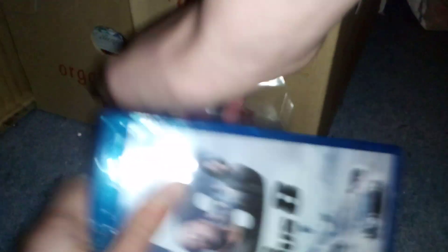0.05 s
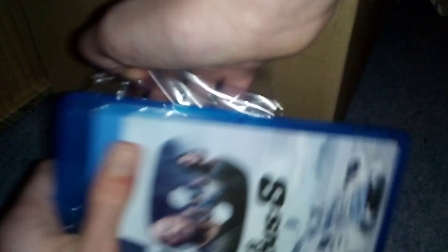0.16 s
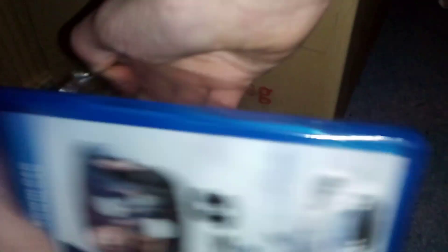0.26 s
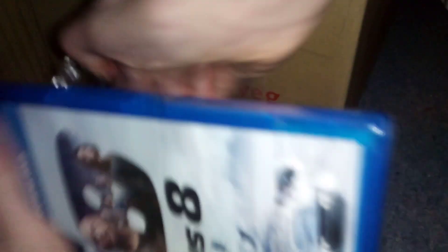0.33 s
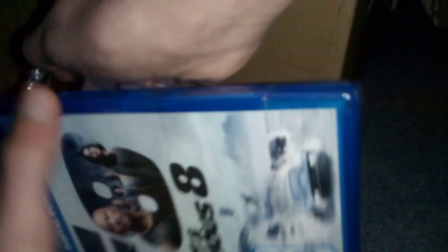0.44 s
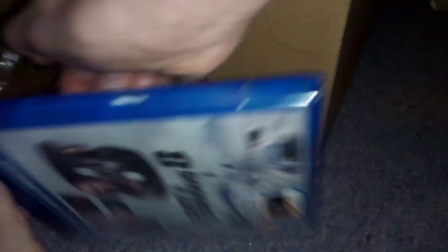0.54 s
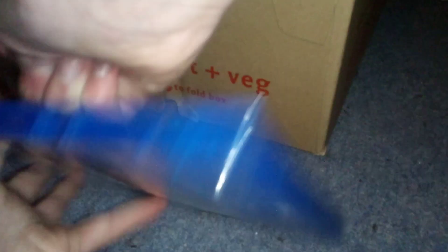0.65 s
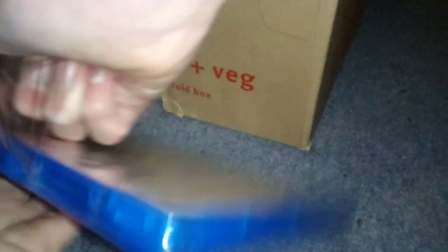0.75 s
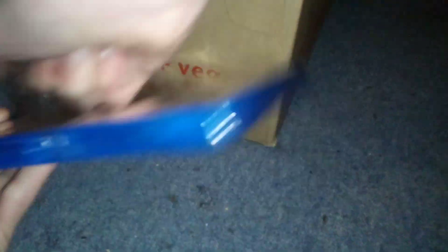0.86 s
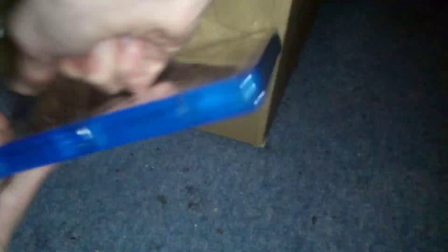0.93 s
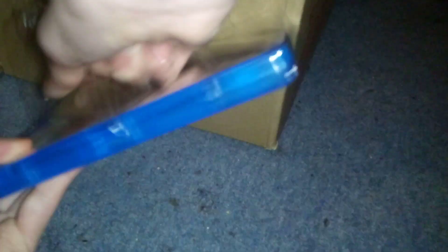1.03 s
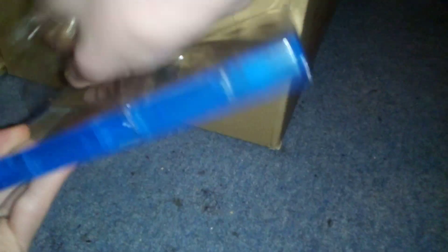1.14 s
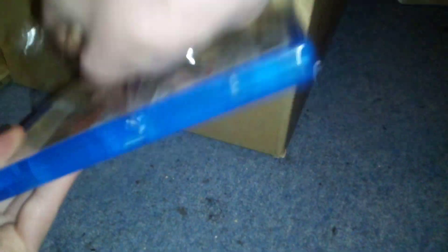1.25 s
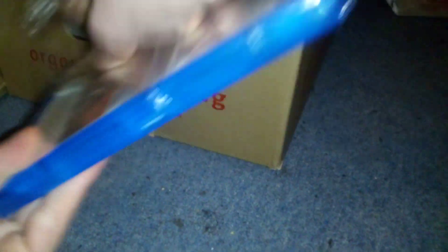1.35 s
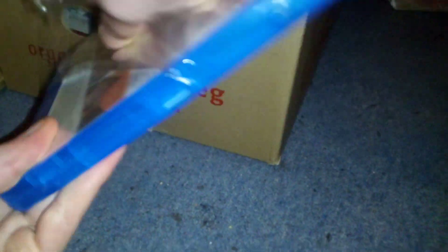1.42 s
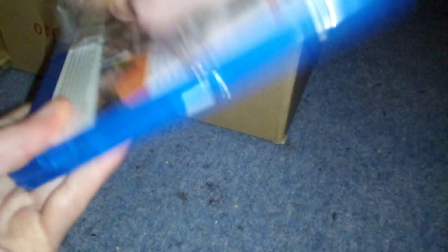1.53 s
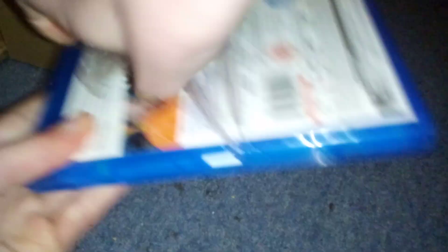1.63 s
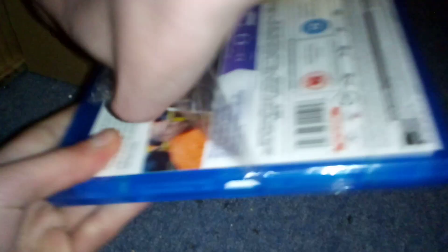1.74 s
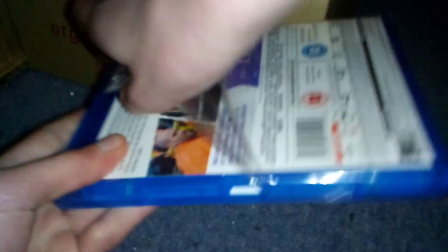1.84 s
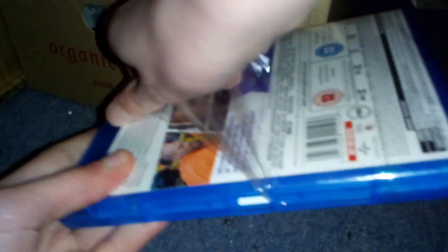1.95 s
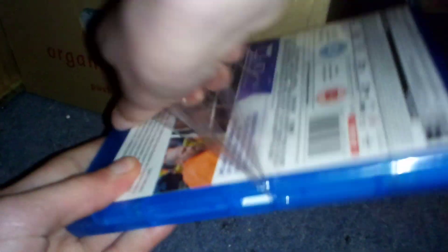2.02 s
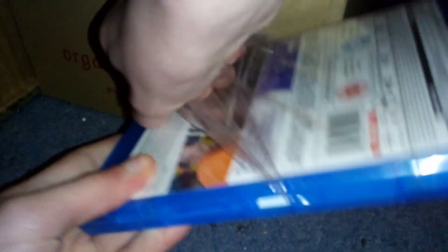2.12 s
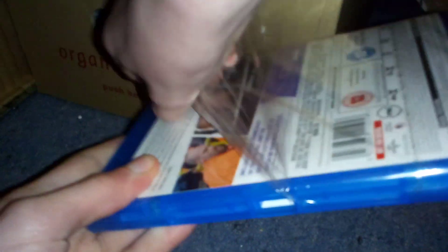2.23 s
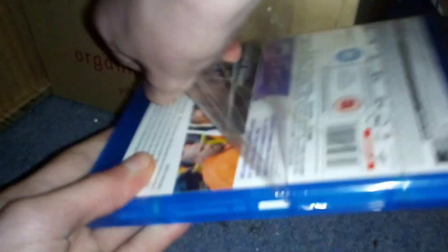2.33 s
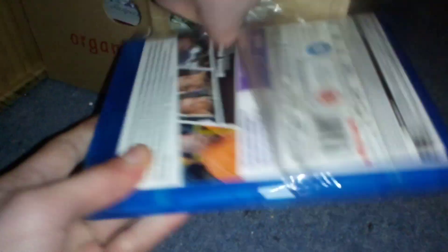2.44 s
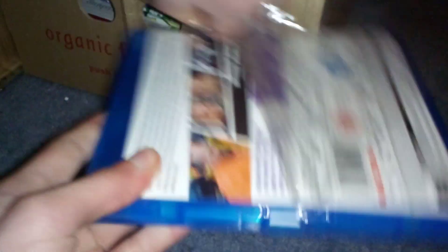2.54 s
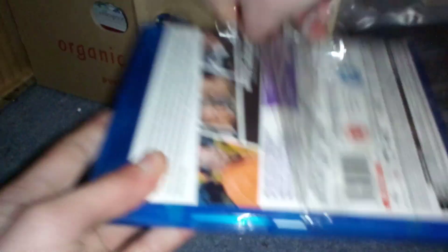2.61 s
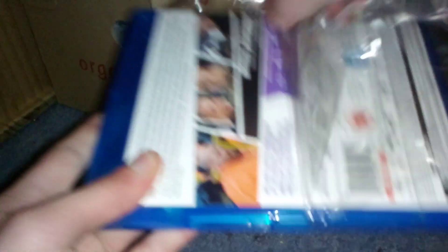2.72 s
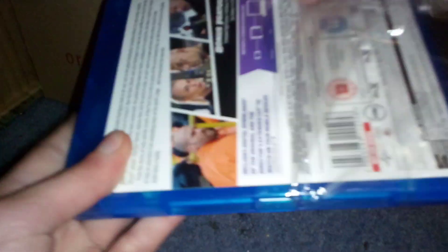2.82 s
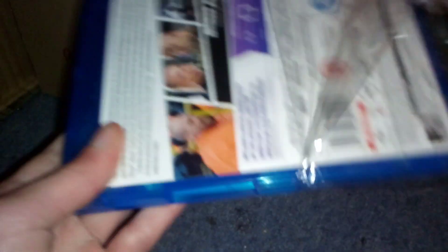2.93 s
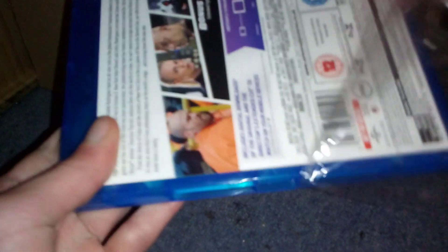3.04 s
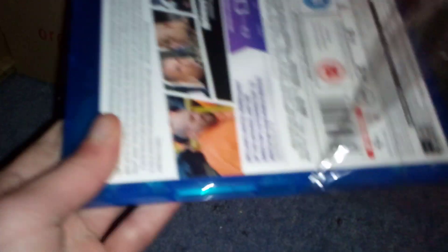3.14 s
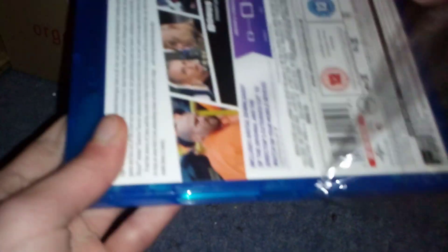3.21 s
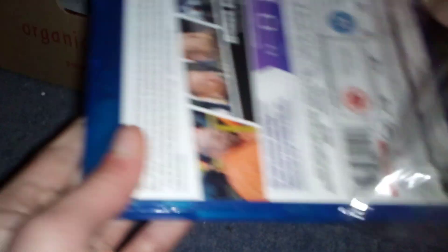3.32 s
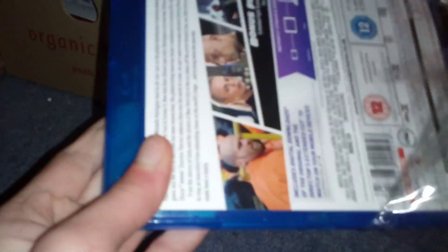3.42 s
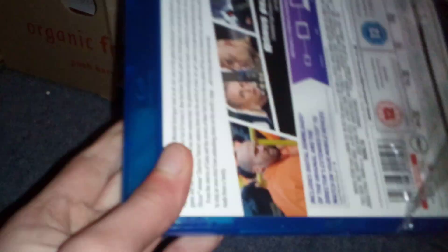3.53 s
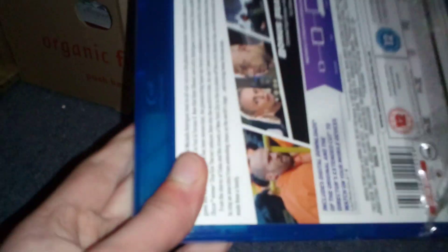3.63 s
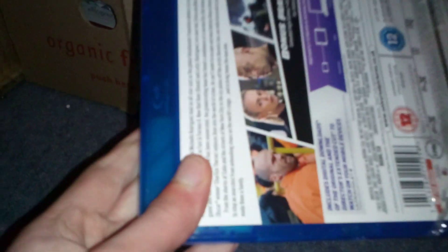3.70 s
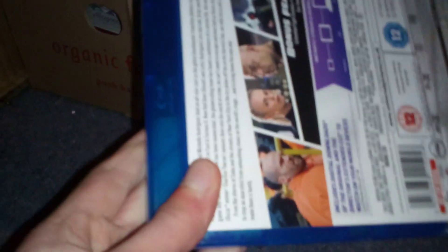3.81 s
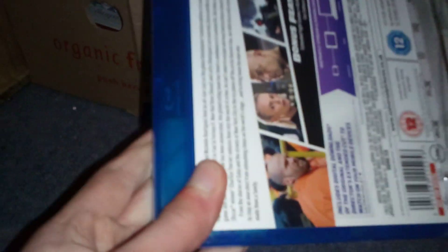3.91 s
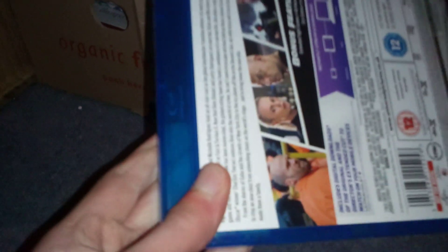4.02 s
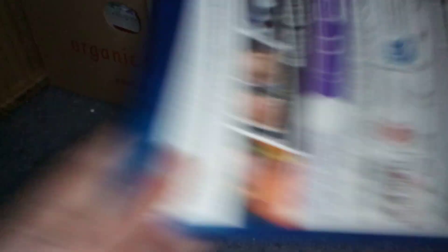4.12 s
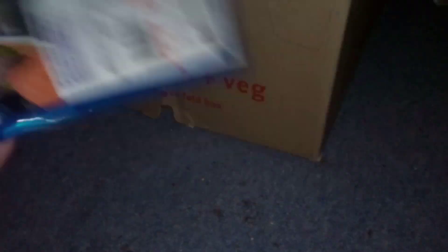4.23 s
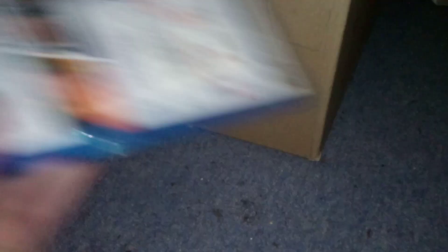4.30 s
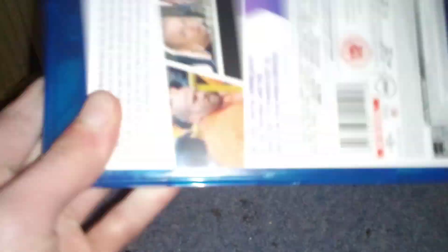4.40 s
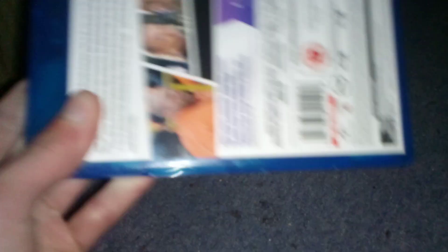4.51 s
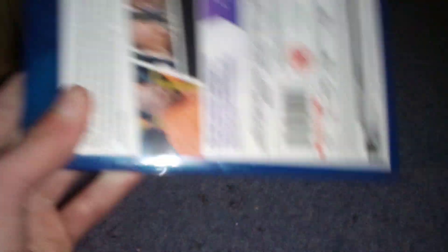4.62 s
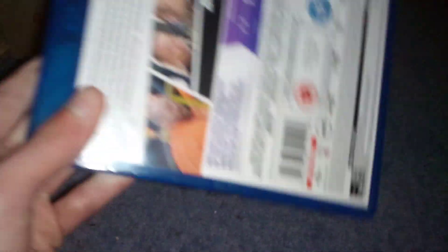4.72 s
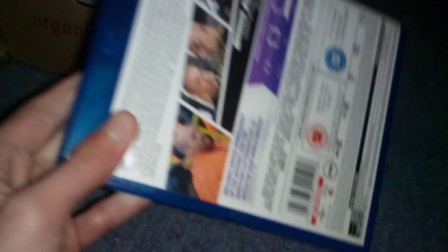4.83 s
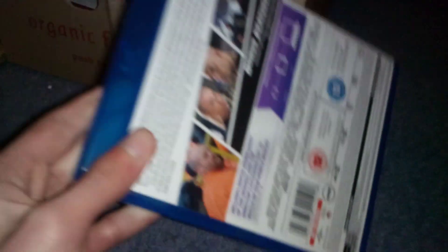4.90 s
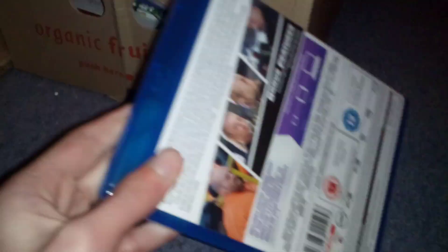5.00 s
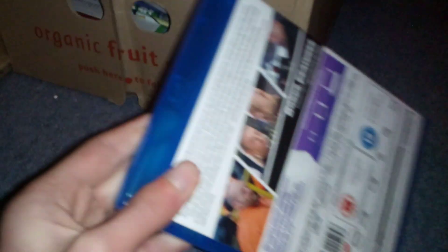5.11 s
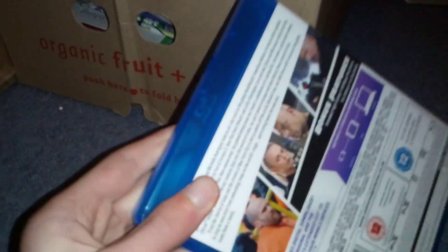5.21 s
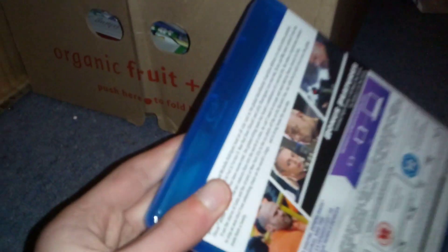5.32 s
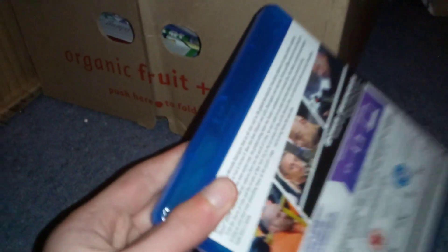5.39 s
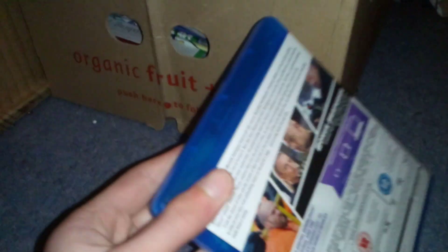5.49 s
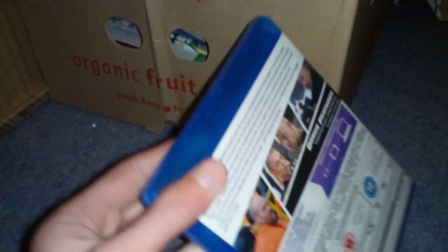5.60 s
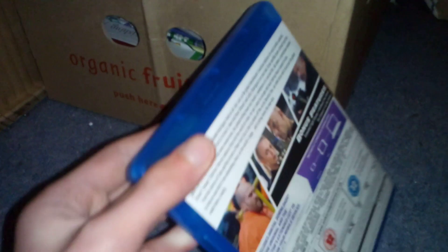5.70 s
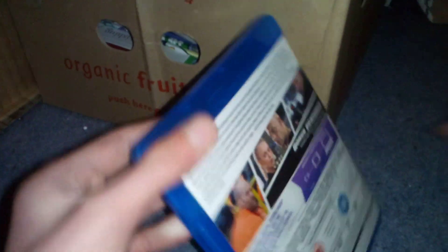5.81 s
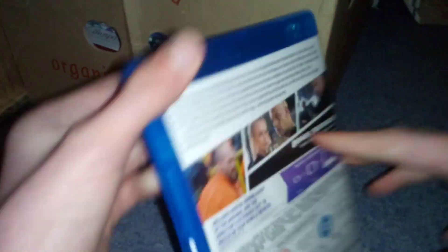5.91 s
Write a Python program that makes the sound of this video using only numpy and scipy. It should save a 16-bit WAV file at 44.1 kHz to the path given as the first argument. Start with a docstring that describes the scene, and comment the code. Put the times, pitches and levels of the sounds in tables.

```python
"""Thin shrink-wrap is peeled off a plastic disc case in short tugs, close to a phone in a small carpeted room.
Film: streams of noise-burst creases crinkle, snap, rustle and rip, each ringing at its facet's pitch.
Case: decaying modes and stick-slip noise knock against fingers and palm; late nail taps ring the edge.
Background: shaped noise hisses evenly, and a faint low sine hum rises slowly and comes and goes."""
import sys
import numpy as np
from scipy import signal
from scipy.fft import rfft, irfft
from scipy.io import wavfile

SR = 44100
rng = np.random.default_rng(int(sys.argv[2]) if len(sys.argv) > 2 else 0)


def unload_wav(signal):
    """Save mono or channel-first audio to the path in sys.argv[1] as 16-bit WAV at rate SR, clipped to [-1, 1]."""
    wavfile.write(
        sys.argv[1],
        SR,
        np.round(np.clip(np.atleast_2d(signal).T, -1, 1) * 32767).astype(np.int16),
    )


N = 262389
TIME = np.arange(N) / SR


def undb(db):
    """Decibels to amplitude gain."""
    return 10 ** (np.asarray(db) / 20)


def unit(x):
    """Scale to an energy of one along the last axis."""
    return x / np.sqrt(np.sum(x ** 2, axis=-1, keepdims=True))


def colour(points, size):
    """Gain of a (frequency [Hz], level [dB]) outline on the bins of a transform."""
    hz, db = np.transpose(points)
    bin_hz = np.fft.rfftfreq(size, 1 / SR) + 1
    return undb(np.interp(np.log(bin_hz), np.log(hz), db))


def causal(gain):
    """Minimum-phase response of a gain: it starts at once and rings after."""
    cepstrum = irfft(np.log(gain + 1e-6))
    half = cepstrum.shape[-1] // 2
    cepstrum[..., 1:half] *= 2
    cepstrum[..., half + 1:] = 0
    return np.exp(rfft(cepstrum))


def highpass(x, cutoff_hz):
    """Second-order Butterworth high-pass."""
    return signal.sosfilt(signal.butter(2, cutoff_hz, "high", fs=SR, output="sos"), x)


def place(times_s, sounds):
    """Lay short sounds on the time line."""
    out = np.zeros(N)
    starts = (np.maximum(times_s, 0) * SR).astype(int)
    for start, sound in zip(starts, sounds):
        out[start:start + len(sound)] += sound[:max(N - start, 0)]
    return out


def wander(step_s):
    """A random value that drifts linearly to a new place every step."""
    values = rng.standard_normal(1000)
    return np.interp(TIME / step_s, np.arange(len(values)), values)


# film radiation: (frequency [Hz], relative level [dB])
FILM_RADIATION = [(100, -26), (340, 2.5), (540, -2), (800, 1.5), (1400, 0), (2350, 2), (3400, -3.5),
                  (4500, -3), (5600, 2), (6600, 4), (7800, -7), (10000, -14), (13500, -18.5), (15200, -10)]


def creases(facet_hz, ring_s, width_octaves, ring_db, click, flutter_db, flutter_s, size):
    """One buckling per row: a click, a brief shiver and a flutter of the film, ringing at the facet's pitch."""
    t = np.arange(size) / SR
    bin_hz = np.fft.rfftfreq(size, 1 / SR) + 1
    burst = unit(t * np.exp(-t / ring_s))
    flutter = unit(np.exp(-t / flutter_s) * (1 - t * SR / size))
    shape = burst + undb(flutter_db) * flutter
    shiver = unit(rng.standard_normal((len(facet_hz), size)) * shape)
    shiver[:, int(ring_s * SR)] += click
    # broad hump of the bending sheet, narrow resonance of the facet on top
    octaves = np.log2(bin_hz / facet_hz[:, None])
    hump = 1 / (1 + (octaves / width_octaves) ** 2)
    resonance = undb(ring_db) / (1 + (octaves / 0.05) ** 2)
    response = causal((hump + resonance) * colour(FILM_RADIATION, size))
    return unit(irfft(rfft(shiver) * response))


def crinkle(level_db, per_s, centre_hz, scatter_octaves, size_spread_db, largest_db, ring_s, width_octaves, size):
    """A random stream of creases, many small and few large, that follows a level in time."""
    count = int(per_s * N / SR)
    when, chance, pitch = rng.random((count, 3)).T
    times_s = (np.arange(count) + 2 * when - 1) / per_s
    raw_db = -size_spread_db * np.log(1 - chance)
    sizes = undb(largest_db * np.tanh(raw_db / largest_db))
    facet_hz = centre_hz * 2 ** (scatter_octaves * (2 * pitch - 1))
    grains = creases(facet_hz, ring_s, width_octaves, ring_db=2, click=.15,
                     flutter_db=-4, flutter_s=.006, size=size)
    return unit(place(times_s, grains * sizes[:, None])) * np.sqrt(N) * undb(level_db)


# tension builds before a tug takes hold and drains after it
TUG_ATTACK_S, TUG_RELEASE_S = 0.013, 0.027


def tug(start_s, hold_s):
    """Exponential attack, hold and release of one pull, as a gain."""
    early_s = np.maximum(start_s - TIME, 0)
    late_s = np.maximum(TIME - start_s - hold_s, 0)
    return np.exp(-early_s / TUG_ATTACK_S - late_s / TUG_RELEASE_S)


# tugs of the hand on the film:
# (time [s], hold [s], relative crinkle level [dB], slack folds relative to crinkle [dB])
FILM_TUGS = [(0.0, 0.031, -49.5, 1.5), (0.089, 0.23, -53, 3), (0.359, 0.044, -54, 1.5),
             (0.47, 0.24, -58.5, 0.5), (0.648, 0.087, -50.5, -3.5), (0.8, 0.062, -52.5, -1.5),
             (1.077, 0.19, -60.5, -19), (1.299, 0.1, -59.5, -1), (1.509, 0.28, -51, -4),
             (1.6, 0.14, -45.5, -4), (1.814, 0.22, -46.5, -7), (2.08, .13, -45.5, -6),
             (2.337, 0.14, -48.5, -8.5), (2.55, 0.36, -53.5, -10), (2.76, 0.033, -47.5, -1),
             (2.937, 0.031, -43, -4), (3.057, 0.01, -47.5, 1), (3.218, 0.021, -56, -0.5),
             (3.289, 0.13, -55.5, -6), (3.441, 0.032, -55.5, 7.5), (3.612, 0.058, -46.5, -1),
             (3.871, 0.079, -57.5, -3.5), (4.035, 0.032, -49.5, 0.5), (4.134, 0.097, -42.5, -4),
             (4.317, 0.22, -54, -30), (4.622, 0.012, -50.5, -17), (4.725, 0.0082, -61.5, 0),
             (4.79, 0.056, -59, -31), (4.899, 0.011, -50.5, -12.5), (5.555, 0.023, -59, -8.5)]
# loose film ticks between tugs until the hand lets go
LOOSE_DB, LOOSE_SLACK_DB, LET_GO_S = -67.5, -20.5, 4.95


def effort():
    """Control levels [dB] of taut film and slack folds: tug powers add up over the ticking of the loose film."""
    taut_power = slack_power = 1e-14
    loose = (0, LET_GO_S, LOOSE_DB, LOOSE_SLACK_DB)
    for start_s, hold_s, db, folds_db in [*FILM_TUGS, loose]:
        power = (undb(db) * tug(start_s, hold_s)) ** 2
        taut_power = taut_power + power
        slack_power = slack_power + power * undb(folds_db) ** 2
    return 10 * np.log10([taut_power, slack_power])


def peeling():
    """Taut film crackles high, its slack folds rustle lower, and the shifting grip bumps softly on the case."""
    pull_db, slack_db = effort()
    taut = crinkle(pull_db - .3, per_s=680, centre_hz=4770, scatter_octaves=1.25, size_spread_db=5.5,
                   largest_db=24.0, ring_s=.0004, width_octaves=1.0, size=512)
    slack = crinkle(slack_db - 2.5, per_s=300, centre_hz=1201, scatter_octaves=1.1, size_spread_db=3.5,
                    largest_db=17.5, ring_s=.0008, width_octaves=0.76, size=768)
    grip = crinkle(slack_db - 14.5, per_s=55, centre_hz=223.8, scatter_octaves=1.0, size_spread_db=2.5,
                   largest_db=17.5, ring_s=0.0049, width_octaves=0.27, size=2048)
    return taut + slack + grip


# hiss spectrum: (frequency [Hz], relative density [dB])
HISS_SPECTRUM = [(40, 16.5), (400, -3), (1500, -10), (2200, 3), (3300, -12.5), (6300, -11.5), (9000, -26),
                 (16000, -27.5)]
HISS_RMS_DB = -73.5


def hiss():
    """Steady noise shaped by a spectral outline."""
    noise = irfft(rfft(rng.standard_normal(N)) * colour(HISS_SPECTRUM, N), N)
    return undb(HISS_RMS_DB) * unit(noise) * np.sqrt(N)


# low hum: (time [s], RMS level [dB])
HUM_LEVEL = [(0, -93), (2.4, -72.5), (3.75, -72), (4.0, -63), (5.02, -67.5), (5.28, -112), (5.47, -66.5),
             (5.95, -69)]
HUM_START_HZ, HUM_RISE_HZ_PER_S = 50.4, 2.9


def hum():
    """A slowly rising sine that comes and goes."""
    hum_hz = HUM_START_HZ + HUM_RISE_HZ_PER_S * TIME
    phase = 2 * np.pi * np.cumsum(hum_hz) / SR
    level_db = np.interp(TIME, *np.transpose(HUM_LEVEL))
    return np.sqrt(2) * np.sin(phase) * undb(level_db)


# loose film slides over itself: (time [s], length [s], level before swells [dB], fold centre pitch [Hz])
FOLD_SLIDES = [(0.087, 0.098, -62, 1230), (0.455, 0.058, -59, 810), (0.76, .17, -57, 2440),
               (1.07, 0.23, -62.5, 2220), (1.299, 0.31, -64, 2350), (1.56, 0.73, -61.5, 8900),
               (1.659, .018, -50, 660), (2.8, .26, -57, 4870), (3.32, 0.23, -65.5, 2800),
               (3.743, 0.068, -52.5, 3200), (4.5, .035, -51, 1380), (4.98, 0.51, -71, 5400),
               (5.081, .38, -75, 2580), (5.198, 0.42, -80.5, 433), (5.606, .17, -70, 4630)]
# sliding film catches and frees, so its rustle swells unevenly
UNEVEN_DB, UNEVEN_STEP_S = 2, 0.035


def rustles(count=150):
    """Overlapping soft brushes of fold on fold, each at its own pitch, swell and fade unevenly."""
    out = np.zeros(N)
    for start_s, length_s, db, centre_hz in FOLD_SLIDES:
        along, strength, pitch = rng.random((count, 3)).T
        fold_hz = centre_hz * 2 ** (.7 * (2 * pitch - 1))
        brushes = creases(fold_hz, ring_s=0.003, width_octaves=0.78, ring_db=-1, click=0,
                          flutter_db=-8, flutter_s=0.011, size=1024)
        gains = undb(30 * strength) * np.sqrt(np.sin(np.pi * along))
        run = place(start_s + length_s * along, brushes * gains[:, None])
        out += unit(run) * np.sqrt(length_s * SR) * undb(db)
    return out * undb(UNEVEN_DB * wander(UNEVEN_STEP_S))


# loudest creases that snap through:
# (time [s], relative level [dB], facet pitch [Hz], facet ring relative to crack [dB])
CREASE_SNAPS = [(0.093, -33, 1010, -11), (0.129, -31, 804, 4), (0.166, -27.5, 4400, -8),
                (0.208, -28.5, 2480, -14), (0.255, -25.5, 5960, -21), (0.266, -24.5, 5550, -13),
                (0.365, -33, 1020, -3), (0.393, -34, 2930, -4), (0.558, -33.5, 880, -6),
                (0.579, -33, 1030, -16), (0.845, -30, 2350, 0), (0.868, -32, 2220, 9),
                (0.935, -36, 2440, 3), (1.064, -24, 1690, 5), (1.091, -29, 2200, -1),
                (1.178, -35, 2500, 18), (1.213, -39, 2450, 14), (1.298, -29.5, 1520, 1),
                (1.34, -30.5, 1840, 2), (1.351, -30.5, 6150, 4), (1.37, -31, 2290, 11),
                (1.386, -28.5, 2270, 11), (1.477, -28.5, 2230, -2), (1.638, -24.5, 2080, -2),
                (1.664, -22, 556, 1), (2.104, -25, 2420, 2), (2.306, -32, 1610, -4),
                (2.347, -30.5, 5200, -10), (2.3744, -13, 2570, -1.5), (2.646, -31, 6300, -14),
                (2.728, -35.5, 985, -4), (2.783, -26.5, 6600, -21), (2.932, -25, 4500, -19),
                (2.946, -25.5, 5680, -1), (2.968, -18.5, 4700, -3), (3.052, -30, 1920, 9),
                (3.07, -21, 2000, 1.5), (3.129, -28, 1960, 5), (3.225, -26.5, 2400, -16),
                (3.355, -30, 4900, -14), (3.372, -29.5, 1470, 0), (3.401, -29.5, 2370, -15),
                (3.452, -24.5, 2100, -3), (3.492, -30.5, 5200, -27), (3.534, -31, 2350, -2),
                (3.571, -34.5, 5600, -17), (3.621, -25, 4400, -20), (3.658, -19.5, 1265, -12),
                (3.725, -33, 5040, -15), (3.755, -32, 1960, -1), (3.768, -27, 1300, -12),
                (3.876, -35.5, 6560, -5), (4.032, -30, 3450, -1), (4.141, -8.5, 6000, -22),
                (4.146, -15, 5350, -19), (4.1965, -14, 1510, -9), (4.204, -19, 870, 0),
                (4.298, -26, 6100, -22), (4.383, -31.5, 6200, -17), (4.72, -26.5, 5370, -13),
                (4.743, -34, 5000, 1), (4.87, -38, 6340, -16), (4.912, -30.5, 5200, 0),
                (5.147, -39, 3550, -2), (5.737, -40, 3980, 1)]


def snaps(ring_cycles=1.4):
    """Large creases flip over with a sharp crack, and the freed facet swings for a few cycles."""
    times_s, db, facet_hz, ring_db = np.transpose(CREASE_SNAPS)
    # relative bandwidth grows with facet pitch
    width = 1.15 * (facet_hz[:, None] / 2400) ** 0.3 + 0.12
    cracks = creases(facet_hz, ring_s=0.00036, width_octaves=width, ring_db=-12, click=0.15,
                     flutter_db=-0.5, flutter_s=0.0028, size=1024)
    cycles = facet_hz[:, None] * TIME[:cracks.shape[1]]
    rings = unit(cycles * np.exp(-cycles / ring_cycles) * np.sin(2 * np.pi * cycles))
    mixed = unit(cracks + rings * undb(ring_db)[:, None])
    return place(times_s, mixed * undb(db + 10.0)[:, None])


# smaller creases follow each snap; levels relative to the snap table
AFTERSHOCK_S, AFTERSHOCK_DB, AFTERSHOCK_FADE_DB = 0.011, -0.5, 9.5


def aftershocks(count=5):
    """A snap unsettles the creases around it: a few smaller ones follow at once, each at its own pitch."""
    times_s, db, facet_hz, _ = np.repeat(CREASE_SNAPS, count, axis=0).T
    wait, pitch = rng.random((len(times_s), 2)).T
    # geometric mean of the snap's pitch and a random one in 1-8 kHz
    tick_hz = facet_hz ** .5 * (1000 * 8 ** pitch) ** .5
    ticks = creases(tick_hz, ring_s=.0004, width_octaves=.7, ring_db=0, click=0,
                    flutter_db=-8, flutter_s=.003, size=512)
    tick_db = db + AFTERSHOCK_DB - AFTERSHOCK_FADE_DB * wait
    return place(times_s + AFTERSHOCK_S * wait, ticks * undb(tick_db)[:, None])


def blow(modes, contact_hz, scuff_db, scuff_low_hz, scuff_s, size=20000):
    """A stick-slip push rings the modes; a soft contact builds up slowly and leaves the upper ones quiet."""
    t = np.arange(size) / SR
    ring = np.zeros(size)
    # the grip shifts and weights the modes a little at every blow
    for hz, mode_db, t60_s in modes:
        gain = undb(mode_db + rng.standard_normal())
        shifted_hz = hz * (1 + .02 * rng.standard_normal())
        decay = np.exp(-np.log(1000) * t / t60_s)
        ring += gain * decay * np.sin(2 * np.pi * shifted_hz * t) * rng.choice([-1, 1])
    slips = undb(5 * wander(.002)[:size])
    scuff = highpass(rng.standard_normal(size) * slips * np.exp(-t / scuff_s), scuff_low_hz)
    soft = signal.butter(2, contact_hz, fs=SR, output="sos")
    onset = 1 - np.exp(-t * contact_hz)
    ring, scuff = unit(signal.sosfilt(soft, np.array([ring, scuff]) * onset))
    return unit(ring + undb(scuff_db) * scuff)


SHELL_LOW_HZ = 75  # the small shell cannot radiate deep bass
# hollow case modes: (nominal frequency [Hz], nominal level [dB], T60 [s])
CASE_MODES = [(109.5, 1.5, 0.11), (140, 2.5, 0.16), (171.5, 1, 0.23), (226.4, 5, 0.13), (309, -2, 0.099),
              (381.3, -3.5, 0.09), (466, -11, 0.13), (667, -6.5, 0.071), (849, -0.5, 0.098),
              (1221, 2.5, 0.096), (1715, 2, 0.045), (2228, 5.5, 0.051)]
# knocks on fingers and palm:
# (time [s], relative level [dB], contact hardness [Hz], scuff relative to ring [dB])
CASE_KNOCKS = [(1.063, -29, 900, -9.5), (1.226, -53, 460, 0), (1.309, -51.5, 510, 0), (1.405, -54, 260, 1),
               (1.574, -45.5, 400, -4), (1.664, -37, 1310, 19), (1.755, -48.5, 302, 5),
               (2.375, -34, 1020, 24), (2.415, -38, 510, 8), (2.421, -31, 503, -4), (2.446, -39, 1300, 12),
               (2.484, -49, 280, -5), (2.983, -43.5, 384, -17), (3.064, -45.5, 700, -11),
               (4.142, -27, 1620, 13), (4.196, -21, 1890, 3), (4.203, -18, 600, -7),
               (4.322, -36.5, 1460, -5), (4.357, -33, 259.7, -10), (4.506, -39, 260, -16),
               (5.942, -43.5, 2070, 2.5)]


def knocks():
    """Fingers and palm move the whole shell, which rings and scuffs."""
    thuds = []
    for _, db, contact_hz, scuff_db in CASE_KNOCKS:
        thud = blow(CASE_MODES, contact_hz, scuff_db, scuff_low_hz=235, scuff_s=0.016)
        thuds.append(thud * undb(db + 25.5))
    return highpass(place([row[0] for row in CASE_KNOCKS], thuds), SHELL_LOW_HZ)


# a tear as a run of tiny breaks: (time [s], length [s], level [dB], facet centre pitch [Hz])
FILM_RIPS = [(2.374, 0.099, -39.5, 5400), (2.966, 0.034, -56, 4540), (4.144, .09, -41, 4050)]


def rips(count=70):
    """A tear runs along the film as a close string of breaks that weaken as the tension goes."""
    out = np.zeros(N)
    for start_s, length_s, db, centre_hz in FILM_RIPS:
        when, strength, pitch = rng.random((count, 3)).T
        along = (np.arange(count) + when) / count
        facet_hz = centre_hz * 2 ** (1.5 * (2 * pitch - 1))
        breaks = creases(facet_hz, ring_s=0.00042, width_octaves=1.5, ring_db=-26.0, click=0.28,
                         flutter_db=-8.5, flutter_s=0.0032, size=512)
        gains = undb(12.0 * strength - 18 * along)
        run = place(start_s + length_s * along, breaks * gains[:, None])
        out += unit(run) * np.sqrt(length_s * SR) * undb(db)
    return out


# stiff case edge modes: (nominal frequency [Hz], nominal level [dB], T60 [s])
EDGE_MODES = [(1160, -5, 0.073), (2470, 6.5, 0.033), (3770, 2, 0.018), (6400, 7, 0.041)]
# light fingernail catches: (time [s], relative level [dB])
NAIL_TAPS = [(5.467, -53.5), (5.484, -56), (5.526, -55.5)]


def nail_taps():
    """A fingernail catches lightly on the case and rings only its stiff edge."""
    taps = []
    for _, db in NAIL_TAPS:
        tap = blow(EDGE_MODES, contact_hz=3000, scuff_db=-3, scuff_low_hz=700, scuff_s=0.011)
        taps.append(tap * undb(db + 25.0))
    return highpass(place([row[0] for row in NAIL_TAPS], taps), SHELL_LOW_HZ)


def room(x, wet_db, t60_s, near_db, near_s, size=22050):
    """Quick reflections from case, hands and a cardboard box, plus the short tail of the room."""
    t = np.arange(size) / SR
    near = unit(rng.standard_normal(size) * np.exp(-t / near_s) * (t > .0015))
    tail = unit(rng.standard_normal(size) * np.exp(-np.log(1000) * t / t60_s) * (t > .007))
    reflections = undb(near_db) * near + undb(wet_db) * tail
    return x + signal.fftconvolve(x, reflections)[:N]


def scene():
    """Film and case in the room, over hiss and hum."""
    film = peeling() + rustles() + snaps() + aftershocks() + rips()
    case = knocks() + nail_taps()
    film = room(film, wet_db=-17.5, t60_s=0.44, near_db=-11.5, near_s=0.0087)
    case = room(case, wet_db=-19.5, t60_s=0.64, near_db=-22.0, near_s=0.036)
    return (film + case + hiss() + hum())[None]


TOP_HZ = 16100


def record(dry):
    """The phone drops the deepest bass and cuts the highest treble."""
    thin = highpass(dry, 40)
    # order 10, 0.2 dB ripple, 70 dB stopband
    return signal.sosfilt(signal.ellip(10, .2, 70, TOP_HZ, fs=SR, output="sos"), thin)


dry = scene()
out = record(dry)
unload_wav(out)
```